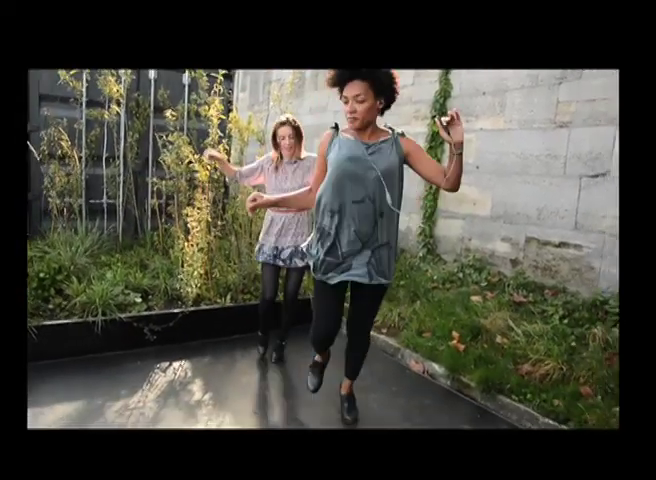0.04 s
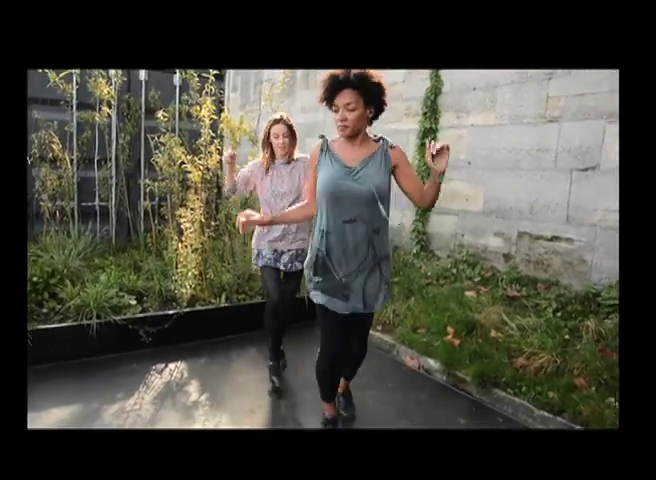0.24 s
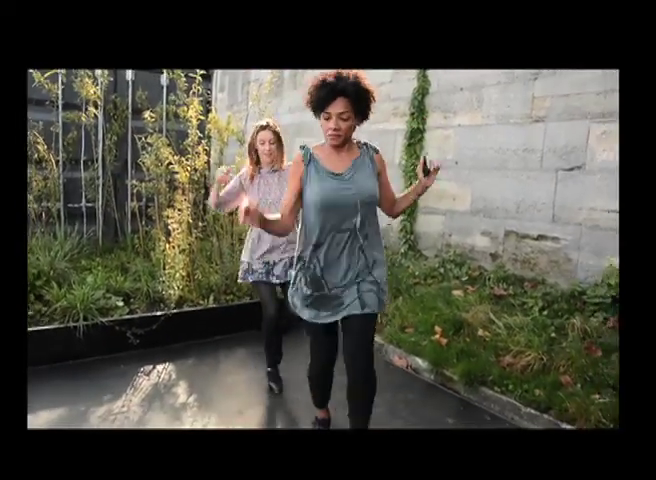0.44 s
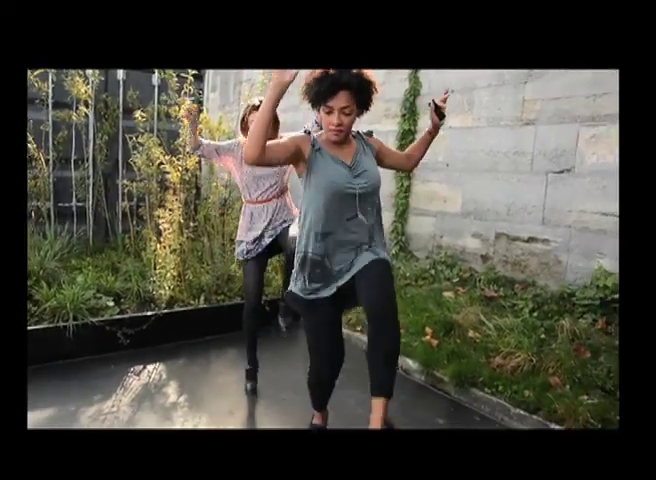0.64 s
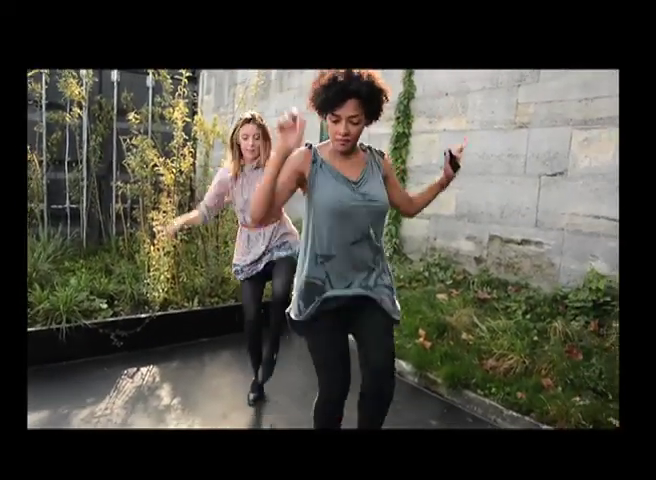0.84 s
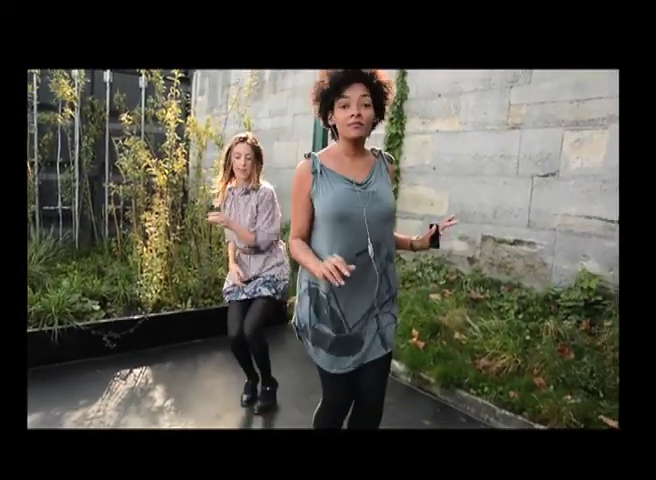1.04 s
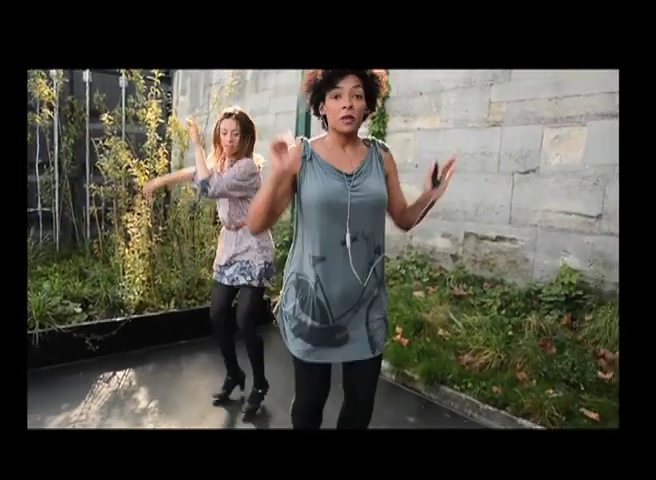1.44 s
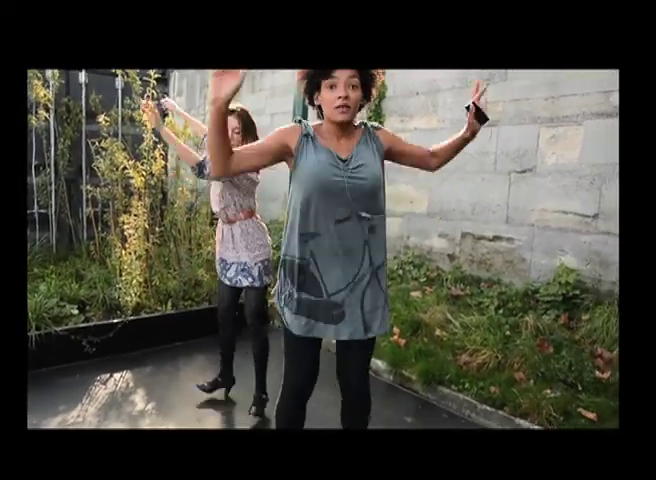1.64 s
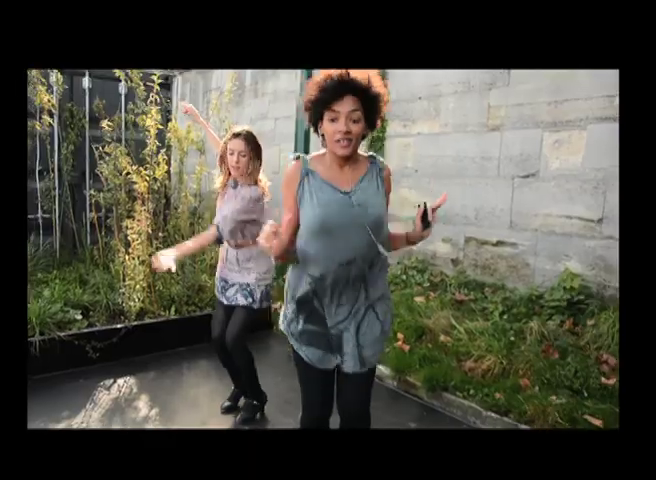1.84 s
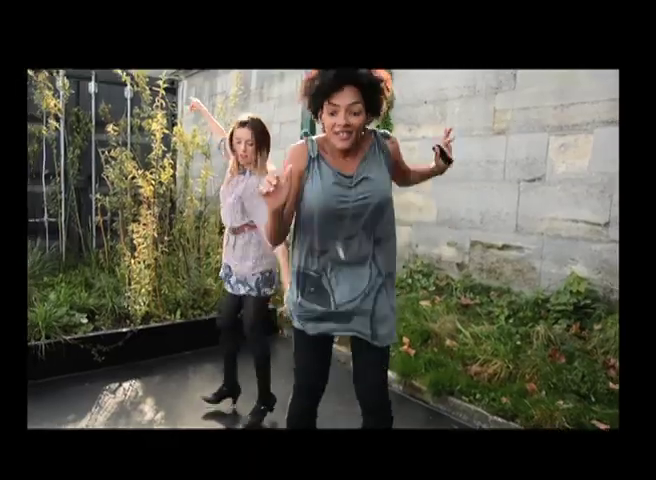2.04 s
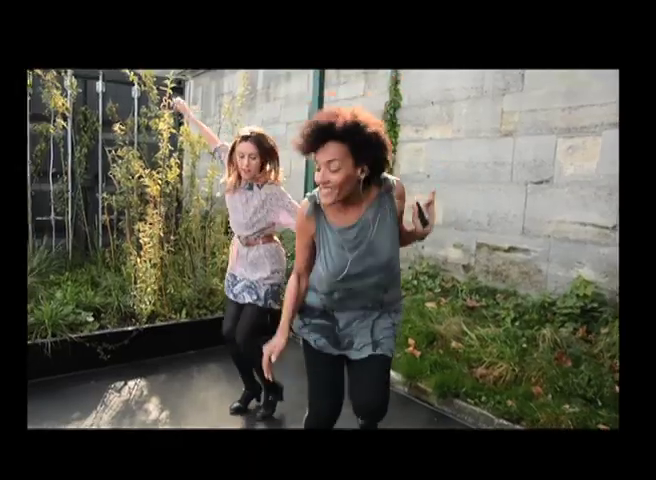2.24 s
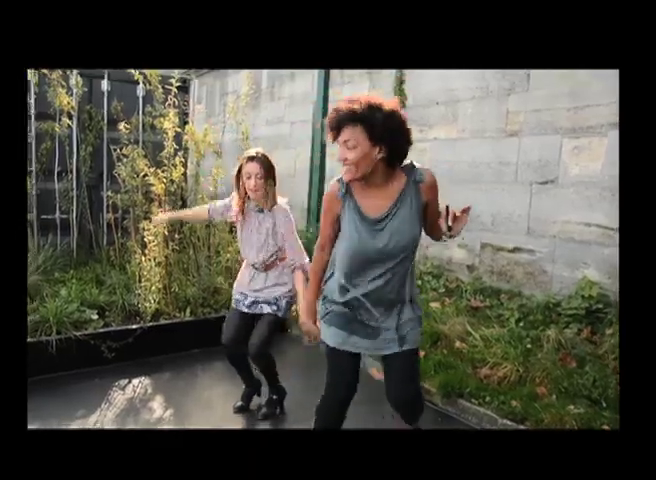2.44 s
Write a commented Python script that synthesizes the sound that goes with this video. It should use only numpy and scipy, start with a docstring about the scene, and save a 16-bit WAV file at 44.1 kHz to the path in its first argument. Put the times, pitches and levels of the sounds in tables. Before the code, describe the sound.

Tap shoes strike a wooden platform, close up in a walled garden. A few sharp clicks and sole brushes lead to a hard stamp, a short pause, then a quick run of louder taps with hollow thumps.

```python
"""Tap shoes knock and click on a wooden platform, close up in a walled garden.
Each step sets the boards knocking and the whole platform booming. Metal plates slap the wood with
a crack, a clack, a sizzle and a choked ring; soles brush between steps, and a grazed plate rings free.
The walls return a short tail over a low outdoor rumble; the hardest taps overload the recorder."""
import sys
import numpy as np
from scipy import signal
from scipy.io import wavfile
from scipy.ndimage import uniform_filter1d

SR = 44100
rng = np.random.default_rng(int(sys.argv[2]) if len(sys.argv) > 2 else 0)


def log_audio(samples):
    """Write samples as a 16-bit WAV file to the path given in sys.argv[1]."""
    # one column per channel
    frames = np.atleast_2d(samples).T
    # limit to full scale, then quantise
    limited = np.clip(frames, -1, 1)
    pcm = np.round(limited * 32767).astype(np.int16)
    wavfile.write(sys.argv[1], SR, pcm)


N = 114660

# Plates slapping the boards: start_s, click_db, ring_hz, clack_db, sizzle_db
TAPS = [(0.0898,-16,2050,-19.5,-35),(0.0932,-21.5,2560,-24.5,-26),(0.2479,-8,3200,-24,-24),(0.2499,-3.5,1860,-15,-19),(0.2580,-19,3430,-34,-21),(0.2655,-21,4980,-20.5,-16.5),
        (.7020,-32,1410,-16.5,-29),(0.8281,-11.5,3360,-24,-31),(0.8404,2,3186,-4.5,-8),(.8490,-12,1940,-14,-35),(0.8698,-15,2600,-12,-16.5),(1.289,-31.5,890,-25.5,-46),
        (1.5044,-24,3280,-29,-26.5),(1.5273,-9.5,3250,-9,-18),(1.5374,-20,3670,-32,-30),(1.5503,-6.5,3170,-10.5,-21.5),(1.5594,-19.5,1210,-17,-47),(1.6000,-23,1190,-30.5,-60),(1.7088,-15.5,3160,-16.5,-19),(1.7179,-4,3135,-14.5,-11.5),
        (1.7780,-17,2820,-24.5,-23),(1.7845,-23.5,3370,-38,-27),(1.8048,-22,2870,-17,-41),(1.9513,-28,1450,-6.5,-13),(1.9588,-13.5,5120,-25,-25),(1.9791,-14.5,3400,-9.5,-23),
        (2.1123,-4,2720,-6.5,-13.5),(2.1240,-23,2670,-11.5,-28),(2.146,-23,2840,-20,-53),(2.1700,-0.5,3536,-10.5,-10),(2.1744,-10,2810,-11,-15.5),(2.1814,-13,3320,-18,-22),(2.2540,-5.5,2930,-15,-18.5),(2.2608,-16.5,5160,-15.5,-27.5)]
# A plate grazing the floor: start_s, level_db
GRAZES = [(2.0779,-23),(2.085,-19.5)]
# Bright friction spectrum: freq_hz, gain_db
HISS = [(100,-6),(600,-1),(1500,-10),(3200,2),(5000,-4),(7500,-6.5),(10500,-8.5),(13500,-17.5)]
APART = 0.43  # stereo width of the noise, side over mid


def amp(db):
    """Decibels to gain."""
    return 10 ** (np.asarray(db) / 20)


def read(points, hz):
    """Reads a curve on a log-frequency axis."""
    freqs, values = np.transpose(points)
    return np.interp(np.log(hz + 1), np.log(freqs + 1), values)


def unit(x):
    """Scales to rms 1."""
    return x / np.sqrt(np.mean(x ** 2) + 1e-20)


def crest(x, size):
    """Scales the loudest stretch of size samples to rms 1."""
    return x / np.sqrt(uniform_filter1d((x ** 2).mean(0), size).max() + 1e-20)


def add(mix, start_s, sound):
    """Mixes in a stereo sound."""
    part = mix[:, max(round(start_s * SR), 0):][:, :sound.shape[1]]
    part += sound[:, :part.shape[1]]


def colour(x, spectrum, size=4096):
    """Minimum-phase EQ, so nothing rings ahead of an attack."""
    log_gain = np.log(amp(read(spectrum, abs(np.fft.fftfreq(size, 1 / SR)))))
    impulse = np.fft.ifft(np.exp(np.conj(signal.hilbert(log_gain)))).real[:size // 2]
    return signal.fftconvolve(x, impulse[None], axes=1)[:, :x.shape[1]]


def stereo_noise(size, apart=APART):
    """Two mostly alike channels of white noise."""
    mid, side = rng.standard_normal((2, size))
    return np.array([mid + apart * side, mid - apart * side])


def air(level_db=-32):
    """A steady bed of outdoor rumble and faint hiss."""
    # Outdoor spectrum: freq_hz, gain_db
    rumble = [(20,-16),(45,1),(68,-2),(100,-9),(160,-16),(400,-30),(3900,-46),(13000,-66.5)]
    return amp(level_db) * unit(colour(stereo_noise(N + SR // 8), rumble)[:, -N:])


def ring(modes, t, detune, apart):
    """Damped modes whose phases and tuning depend on where the foot lands."""
    out = np.zeros((2, len(t)))
    for hz, db, t60 in modes:
        phase, shift, skew = rng.uniform(-0.93, 1, 3)
        angle = 2 * np.pi * hz * (1 + detune * shift) * t + np.pi * phase
        out += amp(db - 60 * t / t60) * np.sin(angle + apart * skew * np.array([[1], [-1]]))
    return out


def platform(boom_rise_s=0.011, knock_rise_s=0.0029, lean_db=0.8):
    """The boards knock at once under each step; the whole platform booms a little later."""
    # Weight landing: start_s, boom_db, knock_db
    steps = [(0,-31,-30),(0.094,-36,-32.5),(0.251,-18,-26),(0.267,-15.5,-20),(0.699,-12.5,-19),(0.843,-12,-8.5),(.868,-18,-19),(1.287,-28.5,-37.5),(1.504,-37,-21.5),(1.552,-24.5,-16.5),(1.714,-19.5,-15.5),(1.779,-25,-23),(1.953,-16.5,-13),(1.976,-14,-24),(2.116,-14.5,-13),(2.137,-13.5,-16),(2.17,-15,-13),(2.266,-19,-16.5)]
    # Low modes of the platform: pitch_hz, level_db, t60_s
    boom_modes = [(31.64,-12.5,0.49),(46.7,11,0.089),(63.8,0.5,0.38),(85.24,-7.5,0.41),(101.46,-5.5,0.44),(122,-7.5,0.27)]
    # Higher modes of the boards: pitch_hz, level_db, t60_s
    knock_modes = [(132,-3,0.23),(159.5,-6,0.28),(184.6,-1,0.22),(212.3,2.5,0.14),(237.7,-2.5,0.22),(309.7,-2.5,0.14),(347.6,-6.5,0.14),(438,-7,0.083)]
    t = np.arange(SR // 2) / SR
    for start_s, boom_db, knock_db in steps:
        boom = ring(boom_modes, t, detune=0.05, apart=0.99) * (1 - np.exp(-(t / boom_rise_s) ** 2))
        knock = ring(knock_modes, t, detune=0.1383, apart=0.62) * (1 - np.exp(-t / knock_rise_s))
        thud = amp(boom_db) * crest(boom, size=1400) + amp(knock_db) * crest(knock, size=700)
        yield start_s, thud * amp([[lean_db], [-lean_db]])


def grain(size, depth_db):
    """Uneven, millisecond-scale contact between shoe and wood."""
    roughness = unit(uniform_filter1d(rng.standard_normal(size), size=36))
    return unit(amp(depth_db * np.clip(roughness, -2, 2)))


def burst(t, decay_s, spectrum, push=0, size=64, contact_s=0.0007, rattle_db=-15.5, rattle_s=0.0058):
    """A crack of coloured noise with an optional sharp push; the loose plate buzzes after it."""
    rattle = amp(rattle_db) * np.exp(-t / rattle_s) * grain(len(t), depth_db=11.5)
    force = stereo_noise(len(t)) * (np.exp(-t / decay_s) + rattle) * np.minimum(t / contact_s, 1)
    force[:, int(SR * contact_s)] += push
    return crest(colour(force, spectrum), size)


def taps(click_trim_db=-4):
    """Metal plates slap the boards: a hard click, a woody clack and a bright sizzle."""
    # Spectra of the three layers: freq_hz, gain_db
    click_eq = [(200,-56),(900,-24),(1600,1.5),(2500,2),(3700,-0.5),(5000,-12),(7000,-38.5)]
    clack_eq = [(100,-31.5),(300,6),(550,4),(1300,-3),(1800,-11),(4000,-59)]
    sizzle_eq = [(500,-62),(3000,6.5),(5200,6.5),(7000,0),(10500,-4),(13500,-10)]
    t = np.arange(SR // 12) / SR
    for start_s, click_db, _, clack_db, sizzle_db in TAPS:
        click = amp(click_db + click_trim_db) * burst(t, decay_s=0.0018, spectrum=click_eq, push=4.35)
        clack = amp(clack_db) * burst(t, decay_s=0.0037, spectrum=clack_eq, push=8.1, size=128)
        sizzle = amp(sizzle_db) * burst(t, decay_s=0.0028, spectrum=sizzle_eq)
        yield start_s, click + clack + sizzle


def plates(peak_s=0.00094, ring_trim_db=-0.5):
    """The small plates ring: choked by the foot after a tap, freely after a graze."""
    # Modes of a free plate: pitch_hz, level_db, t60_s
    free_modes = [(2590,1,0.065),(3700,-6,0.027),(2220,-2,0.039)]
    out = np.zeros((2, N))
    t = np.arange(SR // 16) / SR
    choke = t / peak_s * np.exp(-0.5 * (t / peak_s) ** 2)
    for start_s, click_db, ring_hz, _, _ in TAPS:
        modes = [(ring_hz, 0, np.inf), (ring_hz * 0.625, -10.5, np.inf)]  # main and lower bending mode
        tick = ring(modes, t, detune=0.0093, apart=0.24) * choke
        add(out, start_s, amp(click_db + ring_trim_db) * crest(tick, size=48))
    for start_s, level_db in GRAZES:
        ping = ring(free_modes, t, detune=0.012, apart=0.61)
        add(out, start_s, amp(level_db) * crest(ping, size=48))
    return out


def resonate(x, hz, width_hz):
    """A resonance of gain 1 that follows the curve hz."""
    turn = np.exp(2j * np.pi * np.cumsum(hz) / SR)
    pole = np.exp(-np.pi * width_hz / SR)
    return 2 * (turn * signal.lfilter([1 - pole], [1, -pole], x / turn)).real


def brushes(from_hz=680, to_hz=2620, sweep_db=-2.5, grain_db=2.5, lift_s=0.0083):
    """Sole friction swells, holds and lets go; its grit and resonance rise as the foot rolls off."""
    # Soles sliding on the boards: start_s, press_s, hold_s, level_db, hiss_share (0-1)
    strokes = [(0.279,0.024,0.036,-26,0),(0.371,0.0048,0.038,-22.5,0.02),(0.393,0.037,0.047,-17.5,0),(0.61,0.0043,0.027,-29,0.01),(.637,0.055,0.012,-24.5,0.98),(0.728,0.024,0.0069,-37.5,0.66),(1.376,0.013,0.014,-53,1),(1.443,0.038,0.0046,-38,0.99),(1.892,0.034,0.014,-45.5,0.9)]
    # Dull friction spectrum: freq_hz, gain_db
    scrape_eq = [(100,-15.5),(400,0),(700,4.5),(1100,1.5),(2000,5),(2900,2.5),(4000,-5),(6000,-15),(13000,-29)]
    t = np.arange(SR // 5) / SR
    for start_s, press_s, hold_s, level_db, hiss_share in strokes:
        roll = np.minimum(t / (press_s + hold_s), 1) ** 2
        grit = stereo_noise(len(t)) * grain(len(t), grain_db * (1 + roll))
        scrape = colour(grit, scrape_eq)
        sweep = resonate(scrape, from_hz * (to_hz / from_hz) ** roll, width_hz=550)
        rasp = unit(unit(scrape) + amp(sweep_db) * unit(sweep))
        rub = np.sqrt(1 - hiss_share) * rasp + np.sqrt(hiss_share) * unit(colour(grit, HISS))
        pressure = np.minimum(t / press_s, 1) * np.exp(-np.maximum(t - press_s - hold_s, 0) / lift_s)
        yield start_s, amp(level_db) * rub * pressure


def scuffs(trim_db=-6):
    """A flick of hiss as a plate grazes the floor."""
    t = np.arange(SR // 12) / SR
    for start_s, level_db in GRAZES:
        yield start_s, amp(level_db + trim_db) * burst(t, decay_s=0.0037, spectrum=HISS)


def garden(x, near_db=-6, near_s=0.013, echoes_per_s=2500, tail_db=-10, tail_rise_s=0.0058):
    """Quick scatter from the floor and nearby wall, then the tail of the walled garden."""
    # Decay of the tail: freq_hz, t60_s
    decay_times = [(100,0.31),(1500,0.4),(12000,0.37)]
    # Tone of the reflections: freq_hz, gain_db
    wall_eq = [(60,-10),(250,0),(1200,2.4),(4000,-2.5),(12000,-2.5)]
    t = np.arange(SR * 3 // 4) / SR
    scatter = stereo_noise(len(t), apart=0.22) * (rng.random(len(t)) < echoes_per_s / SR)
    scatter *= (t > 0.002) * np.exp(-t / near_s)
    hz, frame_s, bands = signal.stft(stereo_noise(len(t)), SR, nperseg=256)
    bands *= amp(-60 * frame_s / read(decay_times, hz)[:, None])
    tail = signal.istft(bands, SR, nperseg=256)[1][:, :len(t)]
    tail *= 1 - np.exp(-t / tail_rise_s)
    echoes = (amp(near_db) * unit(scatter) + amp(tail_db) * unit(tail)) / np.sqrt(len(t))
    return signal.fftconvolve(x, colour(echoes, wall_eq), axes=1)[:, :N]


def scene(spot_count=7, lean_db=0.35):
    """Footwork leans left, dealt over spots with their own echoes; the plates' ring stays dry."""
    spots = np.zeros((spot_count, 2, N))
    for k, (start_s, sound) in enumerate([*taps(), *scuffs(), *brushes(), *platform()]):
        add(spots[k % spot_count], start_s, sound)
    footwork = sum(spot + garden(spot) for spot in spots)
    return (footwork + plates() + air()) * amp([[lean_db], [-lean_db]])


def record(dry, dip_start_s=0.2095, dip_end_s=0.224, dip_db=-29, cutoff_hz=13600):
    """The level dips briefly, the hardest taps clip, and a low-pass trims the top."""
    t = np.arange(N) / SR
    in_dip = 1.0 * ((t > dip_start_s) & (t < dip_end_s))
    dip = amp(dip_db * uniform_filter1d(in_dip, size=100))
    clipped = np.clip(dry * dip, -1, 1)
    lowpass = signal.firwin(255, cutoff_hz, window=("kaiser", 8), fs=SR)
    return signal.oaconvolve(clipped, lowpass[None], "same")


dry = scene()
out = record(dry)
log_audio(out)
```